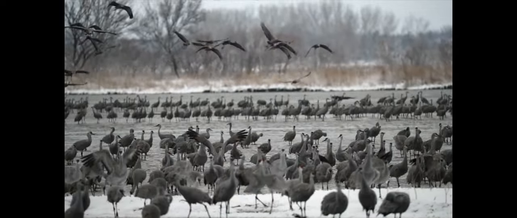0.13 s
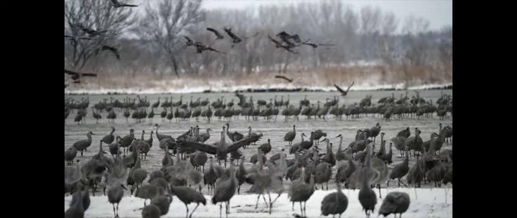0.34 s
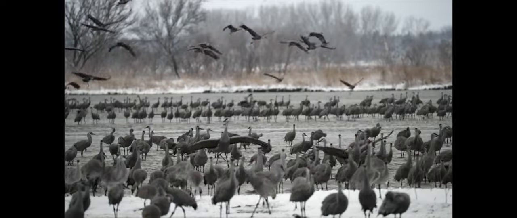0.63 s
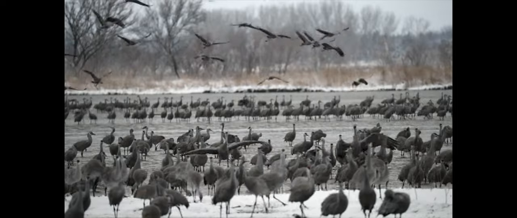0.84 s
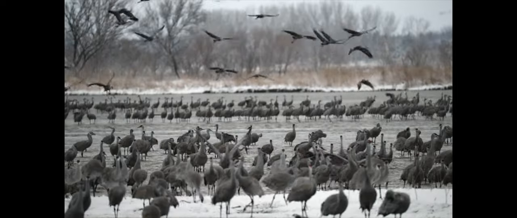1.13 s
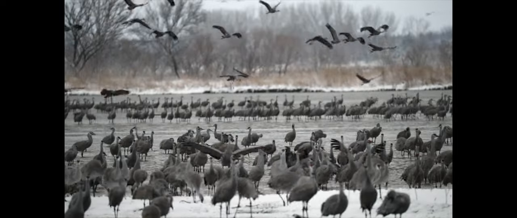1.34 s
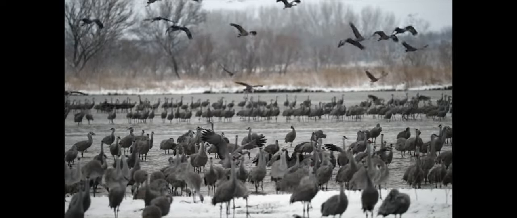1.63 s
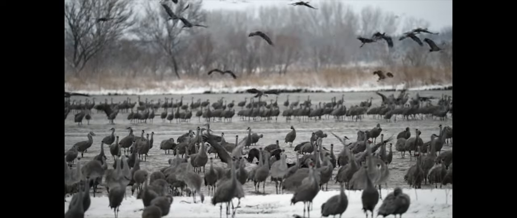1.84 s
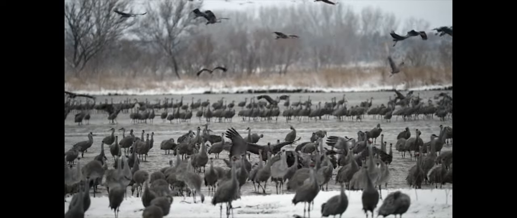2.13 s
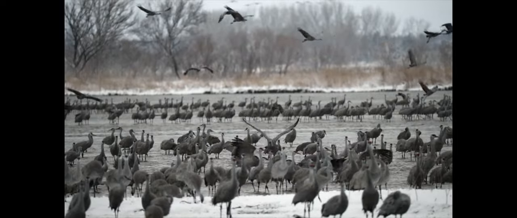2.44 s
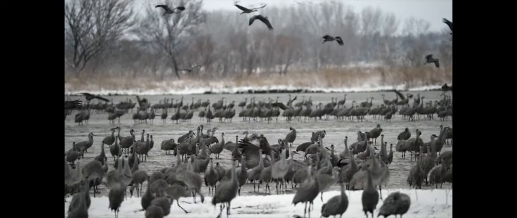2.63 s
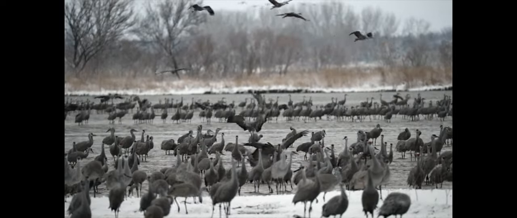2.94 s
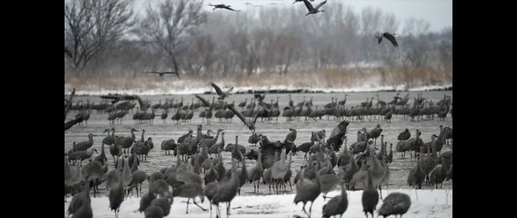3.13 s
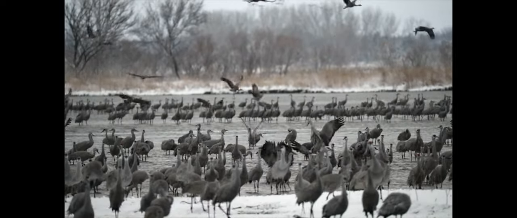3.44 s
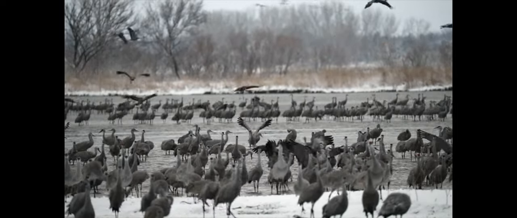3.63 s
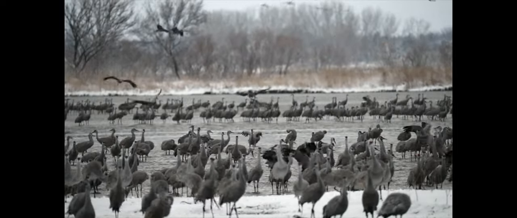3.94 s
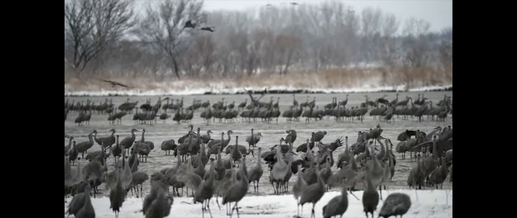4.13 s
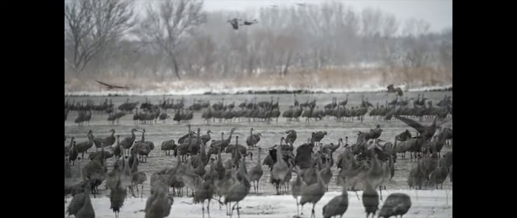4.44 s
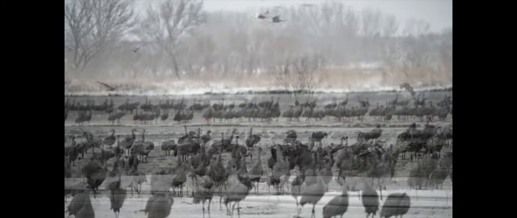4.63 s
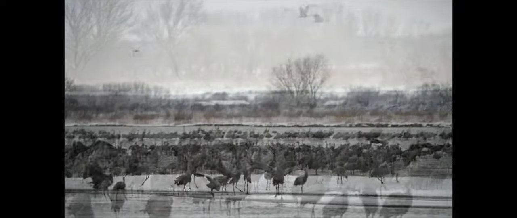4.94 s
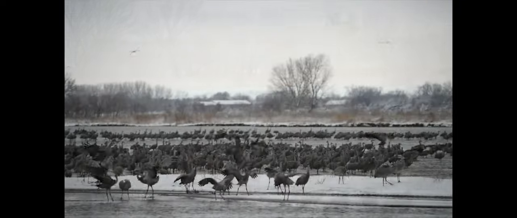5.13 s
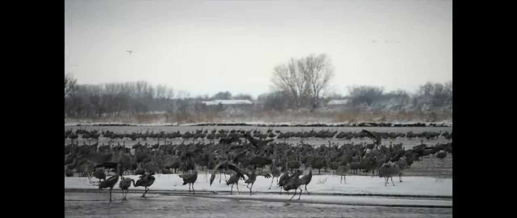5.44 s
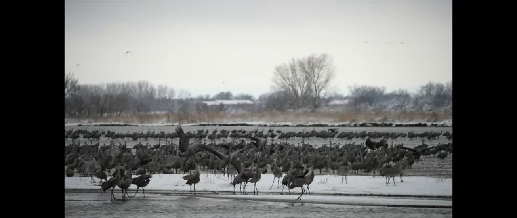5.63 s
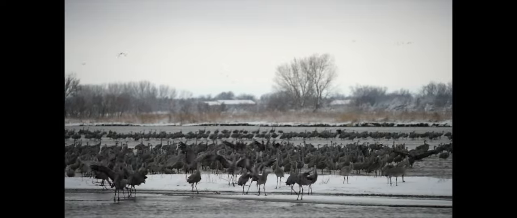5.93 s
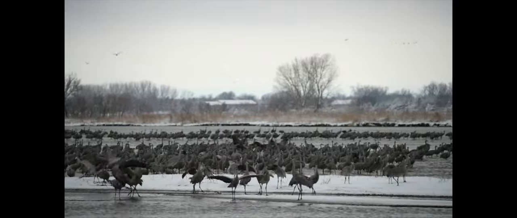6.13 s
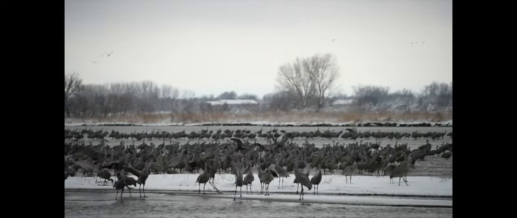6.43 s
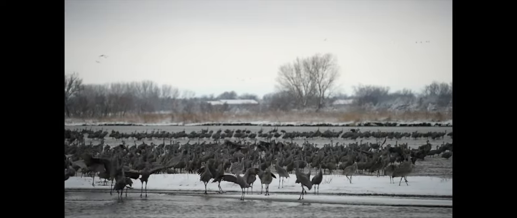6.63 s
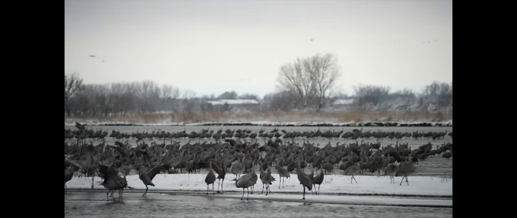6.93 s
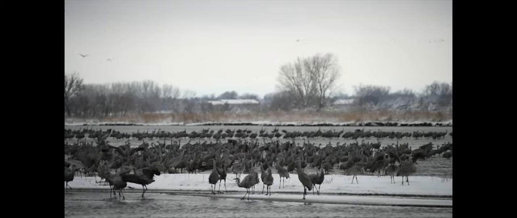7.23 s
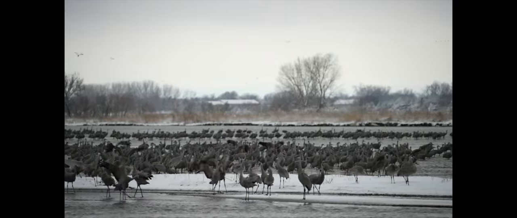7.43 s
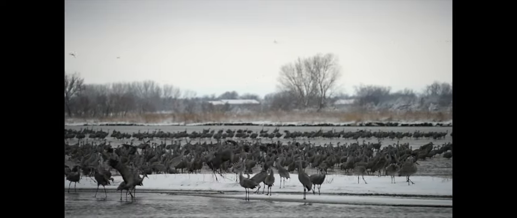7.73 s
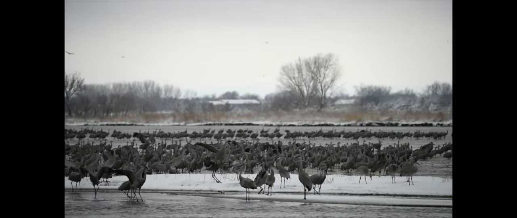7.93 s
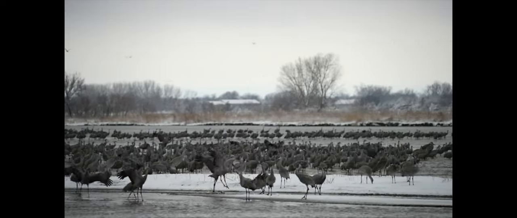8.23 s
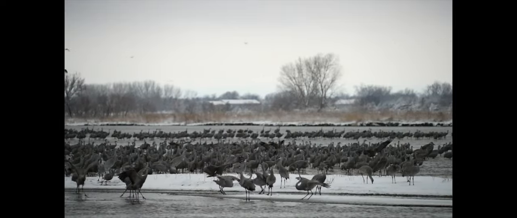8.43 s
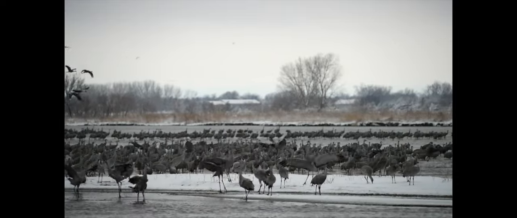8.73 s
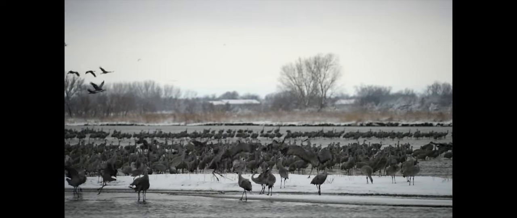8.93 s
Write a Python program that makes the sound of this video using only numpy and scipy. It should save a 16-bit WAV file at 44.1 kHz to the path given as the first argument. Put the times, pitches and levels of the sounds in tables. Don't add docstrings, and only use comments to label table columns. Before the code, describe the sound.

Dense crane chorus heard from near the flock: throaty trills of rapid falling notes, short honking bugles and rounder calls overlap in uneven surges. After about four and a half seconds the microphone seems to move away; the calls soften, gaps open, and single rattles stand out over a faint rolling murmur, soft water, thin high peeps and light hiss. Open air, only slight echo.

```python
import sys
import numpy as np
from scipy import signal
from scipy.fft import rfft, irfft, next_fast_len
from scipy.io import wavfile
from scipy.ndimage import uniform_filter1d, map_coordinates

SR = 44100
rng = np.random.default_rng(int(sys.argv[2]) if len(sys.argv) > 2 else 0)


def to_wav(sig):
    pcm = np.clip(np.atleast_2d(sig), -1, 1) * 32767
    pcm = np.round(pcm).astype(np.int16)
    wavfile.write(sys.argv[1], SR, pcm.T)


def to_linear_factor(level_db):
    exponent = np.asarray(level_db, float) / 20
    return 10 ** exponent


N = 400428

# time in seconds, level in dB.
LISTENING_POINT = [
    (0.0, -72.5),
    (4.55, -73.5),
    (5.0, -84),
    (9.08, -84),
]


def rattles():
    # start in seconds, pitch in Hz, level in dB, octave in dB.
    single_notes = [(.449, 850, -34, -26), (.632, 1222, -49, -5), (.667, 793, -32.5, -31),
                    (.848, 1170, -39.5, -28), (.917, 900, -41, -22), (1.036, 1170, -38.5, -23),
                    (1.244, 839, -34, -31), (1.413, 950, -40, -34), (1.496, 940, -43, -27),
                    (1.972, 1414, -44, -12), (2.135, 947, -39, -24), (2.418, 1040, -41, -21),
                    (2.511, 1196, -42, -32), (2.68, 876, -38, -36), (2.897, 944, -42.5, -20),
                    (2.981, 847, -46, -12), (3.153, 1152, -41, -21), (3.489, 923, -38.5, -23),
                    (3.492, 1178, -44, -14), (3.535, 970, -47, -9), (4.215, 935, -40.5, -32),
                    (4.394, 1220, -45, -27.4), (4.617, 1155, -48, -28), (4.652, 904, -41, -28),
                    (5.816, 1133, -41, -39), (6.76, 960, -51, -18.5), (7.261, 1216, -51, -27),
                    (7.277, 928, -46, -24.4), (8.567, 929, -54.5, -25), (8.784, 1040, -46.5, -34),
                    (2.331, 1357, -52, -4), (2.396, 1280, -53.5, -3), (8.781, 1223, -57, -29)]
    # start in seconds, length in seconds, notes per second,
    # pitch in Hz, level in dB.
    facing = [(.485, 0.11, 27.5, 1450, -49), (.451, 0.16, 27.4, 1285, -51), (.918, 0.093, 28.7, 1190, -46),
              (1.098, .23, 22.4, 1130, -57), (2.516, 0.35, 22, 770, -60), (2.882, .05, 19.5, 1153, -49),
              (3.645, 0.09, 22.3, 1270, -53), (3.791, 0.09, 22.2, 1288, -45), (5.4, 0.067, 27, 878, -63),
              (6.211, .237, 25.3, 1215, -61), (8.575, .12, 29.4, 835, -60), (7.299, 0.17, 32, 1226, -60.5),
              (8.49, 0.21, 25.5, 774, -63)]
    # start in seconds, length in seconds, notes per second,
    # pitch in Hz, level in dB.
    turned = [(.179, .11, 27.3, 1110, -45), (.441, 0.094, 24, 1140, -42.5), (1.532, 0.23, 15, 1140, -47.5),
              (1.909, .133, 28.9, 1200, -44), (2.301, 0.035, 23, 1320, -43), (3.032, .15, 26, 1434, -51.5),
              (3.9, .2, 20.4, 1200, -56), (4.332, .042, 23, 1100, -48.5), (4.722, 0.2, 21, 1350, -54.5),
              (5.175, 0.033, 19, 1033, -53), (5.528, 0.038, 24, 1050, -55), (6.3, .225, 26.5, 1160, -53.5),
              (6.566, 0.085, 27.6, 1050, -55), (6.847, .033, 30.3, 1170, -53),
              (7.1, 0.23, 21.4, 793, -55.5), (7.611, 0.15, 26.7, 1030, -51.5),
              (8.166, 0.24, 30.6, 1110, -57), (8.381, 0.036, 23.1, 1050, -48),
              (8.828, 0.19, 23, 1210, -52.5), (5.227, .16, 22.3, 1380, -59.5), (4.0, .3, 24, 1420, -59),
              (2.04, 0.12, 28, 1400, -57), (5.88, .09, 25, 1350, -56.5), (8.55, .08, 25, 1200, -60),
              (6.94, .09, 23, 1330, -57.5), (3.4, .16, 25, 1350, -56), (5.12, .5, 22, 740, -64.5),
              (2.12, 0.3, 24, 760, -54.5), (1.48, 0.34, 23, 735, -56)]
    rows = [(s - .003, hz, db + 2.5, octave_db + 3.0) for s, hz, db, octave_db in single_notes]
    for birds, octave_db in ((facing, -9), (turned, -22.5)):
        for s, length, rate, hz, db in birds:
            step = np.arange(round(length * rate) + 1) / rate
            swell_db = 4 * np.sin(np.pi * (step + 0.067) / (length + 0.14))
            for delay, rise in zip(step, swell_db):
                rows.append((s - .006 + delay, hz, db + rise + 2.5, octave_db))
    return clicks(*np.transpose(rows), fall=0.15, life=0.0135, click_db=0.0, scatter=0.35)


def clicks(starts, hz, db, octave_db, fall, life, click_db, scatter):
    t = np.arange(int(2.6 * life * SR)) / SR
    chance = scatter * rng.standard_normal((len(starts), 3))
    span = life * np.exp(0.23 * chance[:, :1])
    drop = 1 + fall * (np.exp(-t / (.27 * span)) - .25)
    pitch = hz[:, None] * (1 + .015 * chance[:, 1:2]) * drop
    phase = 2 * np.pi * np.cumsum(pitch, 1) / SR
    octave = to_linear_factor(octave_db)[:, None]
    overtones = np.sin(2 * phase) + 0.17 * np.sin(3 * phase) + 0.046 * np.sin(4 * phase)
    tone = np.sin(phase) + octave * overtones
    shape = (1 - np.exp(-t / 0.0015)) * np.exp(-(t / span) ** 2)
    breath_band = signal.butter(2, [1300, 5200], "band", fs=SR, output="sos")
    breath = signal.sosfilt(breath_band, rng.standard_normal(pitch.shape))
    click = octave * to_linear_factor(click_db - 60 * t / 0.054) * breath
    level = to_linear_factor(db + 1.86 * chance[:, 2])[:, None]
    return mix(starts, level * (tone * shape + click))


def held():
    # start in seconds, length in seconds, pitch in Hz, level in dB.
    level_notes = [(.353, 0.096, 824.6, -45), (1.905, 0.05, 1098, -51), (1.995, 0.039, 1107, -52),
                   (2.036, .04, 1200, -47), (2.411, 0.048, 1100, -44.5), (2.718, 0.067, 852, -49),
                   (3.139, 0.082, 1192, -47.5), (3.5, 0.14, 810, -52.5), (3.534, .1, 927, -43),
                   (3.665, 0.03, 838, -48), (4.727, 0.049, 1208, -56.5), (4.889, 0.065, 761, -57.5),
                   (5.25, 0.098, 893, -62.5), (5.66, 0.088, 1240, -56.5), (7.23, 0.032, 808, -56),
                   (7.655, 0.064, 1148, -61), (7.839, 0.0665, 796, -58), (8.283, 0.068, 1243, -59),
                   (8.529, 0.052, 818, -61.5), (8.926, 0.14, 908, -60.5), (8.52, .1, 1225, -63)]
    # start in seconds, length in seconds,
    # middle pitch in Hz, level in dB.
    sagging = [(.634, 0.055, 1203, -44.5), (0.702, 0.044, 746, -48), (1.312, 0.046, 750, -46.5),
               (1.819, 0.039, 783, -48), (2.086, 0.086, 1148, -46.5), (2.223, 0.052, 930, -47.5),
               (2.571, 0.067, 879.7, -52.5), (3.246, 0.078, 1125, -50), (3.629, 0.06, 1130, -52),
               (4.033, 0.12, 813, -53), (5.935, 0.071, 1148, -43), (6.92, .04, 1118, -61),
               (7.751, 0.07, 937, -49.5), (7.963, 0.055, 1039, -56), (8.615, 0.049, 1104, -53),
               (8.672, 0.089, 817, -60.5), (8.995, 0.074, 1056, -55)]
    # start in seconds, length in seconds,
    # first pitch in Hz, last pitch in Hz, level in dB.
    soft = [(7.55, 0.1426, 740, 685, -62.5), (8.08, 0.075, 1370, 1400, -66), (1.015, 0.11, 1225, 1170, -44),
            (5.45, .06, 1110, 1040, -58), (5.58, 0.092, 1225, 1250, -60), (3.712, .15, 853, 828, -43.5),
            (3.1, 0.0883, 880, 760, -52.5), (6.9, 0.09, 860, 800, -63), (2.41, 0.1, 760, 720, -50.5),
            (6.2, 0.22, 830, 730, -63), (1.9, 0.086, 830, 750, -51.5), (1.14, 0.11, 1300, 1000, -54),
            (8.53, .53, 310, 305, -82), (9.01, .07, 540, 570, -73)]
    # start in seconds, length in seconds,
    # first octave in Hz, last octave in Hz, level in dB.
    octaves = [(0.096, 0.069, 2060, 2030, -57.5), (0.011, 0.028, 1810, 1790, -56),
               (1.824, 0.051, 1812.0, 1600, -62), (1.995, 0.047, 1829.0, 1790, -58),
               (.58, .045, 1870, 1790, -61), (.65, .04, 2390, 2360, -59), (1.045, .075, 2450, 2370, -51),
               (4.754, .042, 2416, 2372, -64), (5.51, .21, 1945, 1920, -71.5), (3.96, .06, 1870, 1760, -62),
               (.113, .045, 1680, 1660, -59), (6.935, .028, 2480, 2440, -70.5),
               (7.035, 0.036, 2420, 2400, -74), (2.338, 0.018, 2510, 2470, -53),
               (3.355, .04, 1820, 1780, -59), (3.527, .03, 2110, 2070, -57), (3.735, .03, 2250, 2150, -59),
               (2.41, .028, 2300, 2190, -58), (3.685, 0.16, 1690, 1690, -62),
               (3.86, 0.065, 1690, 1600, -59), (5.456, 0.043, 2204.0, 2170, -70),
               (8.255, 0.069, 1915, 1860, -66.5)]
    # start in seconds, length in seconds,
    # first pitch in Hz, last pitch in Hz, octave level in dB.
    brassy = [
        (2.923, 0.07, 1104, 1049, -59.5),
        (3.195, 0.096, 1203, 1122, -58),
        (3.886, 0.061, 1108, 1019, -54),
        (4.08, 0.041, 977, 972, -59.5),
        (2.065, .09, 1207, 1143, -57.5),
        (7.425, 0.04, 950, 940, -66.5),
    ]
    # start in seconds, length in seconds,
    # first pitch in Hz, last pitch in Hz, octave level in dB.
    ringing = [
        (7.655, .23, 985, 962, -72.5),
    ]
    ladder = np.arange(9)
    glides = [*soft]
    glides += [(s, length, hz, hz, db) for s, length, hz, db in level_notes]
    for s, length, hz, db in sagging:
        sag = 0.98 * length / 2
        glides.append((s, length, hz * (1 + sag), hz * (1 - sag), db))
    calls = [bugle(*r[:4], r[4] + np.array([-0.5, -30, -32, -41])) for r in glides]
    for s, length, first, last, db in octaves:
        calls.append(bugle(s, length, first / 2, last / 2, [db - 5.5, db, db - 12.5, db - 28]))
    calls += [bugle(*r[:4], np.r_[r[4] + 1.5, r[4] - 6 * ladder], bend=1.76) for r in brassy]
    calls += [bugle(*r[:4], np.r_[r[4], r[4] - 2.1 * ladder]) for r in ringing]
    return sum(calls)


def bugle(s, length, hz_from, hz_to, levels_db, waver=0.003, bend=1):
    t = np.arange(int((length + 0.016) * SR)) / SR
    knots = rng.standard_normal((2, 40))
    pitch_waver, level_waver = [map_coordinates(k, [t * 70]) for k in knots]
    glide = hz_from + (hz_to - hz_from) * (t / length) ** bend
    phase = 2 * np.pi * np.cumsum(glide * (1 + waver * pitch_waver)) / SR
    effort = np.sin(np.pi * t / (t[-1] + 1 / SR)) * to_linear_factor(1.2 * level_waver)
    tone = sum(to_linear_factor(db) * effort ** (0.099 * k) * np.sin((k + 1) * phase) for k, db in enumerate(levels_db))
    shape = np.clip(np.minimum(t, t[-1] - t) / 0.017, 0, 1) * to_linear_factor(1.3 * level_waver)
    return mix([s - .01], np.sqrt(2) * (tone * shape)[None])


def middle():
    # start in seconds, pitch in Hz, level in dB.
    from_near_point = [(0.02, 913, -42), (0.052, 757, -43.5), (0.108, 872, -46), (0.11, 1086, -39.3),
                       (0.136, 1074, -39), (0.17, 894, -39.5), (0.215, 940, -41), (0.243, 1096, -38.5),
                       (0.337, 1085, -37), (0.481, 844, -34), (0.521, 1113, -37), (0.569, 1087, -36),
                       (0.844, 915, -40.5), (0.866, 1052, -40), (0.902, 1210, -39.4), (0.944, 1181, -39),
                       (0.958, 1107, -37.5), (1.016, 854, -36), (1.115, 1144, -40), (1.203, 1087, -39),
                       (1.295, 937, -41.5), (1.323, 904, -40.5), (1.465, 926, -44.0), (1.584, 930, -43.5),
                       (1.616, 1095, -39.5), (1.664, 1060, -39.8), (1.682, 1089, -42), (1.822, 800, -40),
                       (2.009, 1130, -36.5), (2.095, 940, -35.5), (2.147, 1124, -36.4), (2.347, 1039, -44),
                       (2.365, 1303, -41.3), (2.381, 1290, -42.5), (2.45, 775, -39), (2.476, 786, -43.5),
                       (2.504, 754, -43), (2.512, 1094, -39.3), (2.56, 1108, -42), (2.602, 860, -38),
                       (2.636, 880, -39.7), (2.722, 846, -42), (2.768, 840, -39.5), (2.796, 855, -37.5),
                       (2.893, 934, -40.5), (2.913, 908, -39), (2.923, 1188, -40), (2.977, 848, -42),
                       (2.999, 1037, -43), (3.053, 790, -38.1), (3.119, 900, -39.0), (3.181, 1186, -37),
                       (3.215, 1184, -42), (3.306, 758, -40.5), (3.326, 926, -41), (4.019, 1194, -46),
                       (4.049, 1070, -49), (4.063, 1190, -47), (4.083, 983, -46.0), (4.145, 800, -49)]
    # start in seconds, pitch in Hz, level in dB.
    from_far_point = [(4.562, 910, -46.2), (4.574, 1130, -47), (4.608, 902, -41), (4.627, 934, -45.5),
                      (4.669, 890, -42), (4.703, 872, -48), (4.757, 868, -46.5), (4.915, 784, -48.1),
                      (4.935, 800, -46.5), (4.975, 851, -50.5), (5.172, 732, -50), (5.26, 1037, -51.0),
                      (5.302, 1378, -56), (5.406, 1081, -50), (5.446, 1213, -52), (5.519, 1028, -50),
                      (5.575, 991, -50), (5.601, 1098, -49), (5.611, 980, -47.5), (5.631, 1208, -53),
                      (5.751, 1184, -45.3), (5.783, 1095, -45), (6.26, 829, -48), (6.326, 1174, -54),
                      (6.33, 880, -53), (6.338, 952, -53), (6.415, 810, -54), (6.459, 812, -50.5),
                      (6.517, 1080, -53), (6.563, 964, -51), (6.617, 915, -49.0), (6.667, 904, -51.5),
                      (6.701, 935, -51), (6.803, 1126, -56), (6.842, 908, -55), (6.858, 887, -49),
                      (6.893, 1260, -50.5), (6.92, 1141, -50), (6.984, 1190, -50), (7.062, 1077, -53),
                      (7.16, 1100, -51), (7.23, 1045, -50), (7.263, 1154, -46.0), (7.289, 1206, -49.0),
                      (7.395, 1130, -53), (7.407, 884, -49.5), (7.71, 1084, -49), (7.712, 969, -49),
                      (8.157, 1102, -49), (8.189, 1109, -47.5), (8.223, 1072, -47.9), (8.251, 1212, -47),
                      (8.283, 1090, -48), (8.331, 1133, -47.5), (8.367, 1162, -45.4), (8.562, 930, -49),
                      (8.602, 851, -52), (8.73, 815, -51), (8.748, 800, -55), (8.774, 1190, -54)]
    s, hz, db = np.transpose([*from_near_point, *from_far_point])
    return clicks(s, hz, db, 0 * db - 22, fall=0.048, life=.019, click_db=-1.5, scatter=0.31)


def windpipe(calls):
    # frequency in Hz, gain in dB.
    throat = [(600, -1), (2500, 2), (3500, -10), (4100, -4.5), (4850, -1.5), (5800, -7), (7500, -14),
              (11000, -13)]
    return shaped(calls, throat)


def peeps():
    # start in seconds, length in seconds, first pitch in Hz, last pitch in Hz, level in dB.
    piping = [(2.93, .03, 3360, 3200, -60), (2.977, 0.04, 3110, 3080, -61.5),
              (4.845, 0.026, 4350, 4330, -75), (4.906, 0.038, 4050, 4170, -75),
              (4.95, .045, 3860, 3680, -76), (5.097, 0.028, 3270, 3080, -74),
              (5.159, 0.097, 3870, 3740, -80.5), (1.05, .055, 3660, 3560, -67),
              (5.6, 0.17, 4795, 4830, -86), (5.778, 0.043, 4680, 4300, -81), (6.95, .03, 3944, 4055, -80),
              (7.05, 0.013, 3280, 3290, -74), (7.11, .02, 3190, 3320, -74), (7.189, 0.035, 3280, 3300, -78),
              (8.954, .03, 4130, 3820, -76), (7.43, 0.048, 4690, 4410, -78.5),
              (8.829, 0.022, 3800, 4300, -77), (6.389, 0.015, 10300, 10370, -82.5)]
    return sum(bugle(*r[:4], r[4:], waver=0.0077) for r in piping)


def claps():
    # start in seconds, level in dB.
    bill_claps = [
        (5.71, -64),
        (5.975, -66),
        (8.57, -66),
        (8.605, -65),
        (8.645, -69),
    ]
    s, db = np.transpose(bill_claps)
    t = np.arange(SR // 20) / SR
    decay = to_linear_factor(db[:, None] - 60 * t / 0.051)
    ticks = mix(s - .004, decay * rng.standard_normal((len(s), len(t))))
    return shaped(ticks, [(1500, -30), (3600, 9), (6500, -1), (9000, -30)])


def banks(x):
    # frequency in Hz, time to fall 60 dB in seconds.
    echo_times = [(500, 0.53), (1500, 0.37), (5000, 0.084)]
    hz, t, noise = signal.stft(rng.standard_normal(SR // 2), SR, nperseg=256)
    decay = to_linear_factor(-60 * t / along(echo_times, hz)[:, None])
    tail = signal.istft(noise * decay, SR, nperseg=256)[1]
    return signal.fftconvolve(np.pad(x, (300, 0)), tail / np.linalg.norm(tail))[:N]


def flock():
    # peak time in seconds, half width in seconds, peak in dB.
    low_surges = [(0.01, 0.25, -44.5), (.54, 0.14, -43), (1.0, 0.26, -45.5), (1.75, 0.17, -48.5),
                  (2.14, 0.19, -50), (2.55, 0.2, -49), (2.97, 0.13, -45), (3.4, 0.25, -49),
                  (3.85, 0.093, -55), (4.56, 0.29, -55), (5.04, 0.23, -55), (5.92, 0.16, -56.5),
                  (6.3, 0.13, -54.5), (6.68, 0.2, -57.5), (7.05, 0.23, -59), (7.38, 0.14, -53.5),
                  (7.74, 0.14, -54.5), (8.66, 0.18, -56.5), (9.07, 0.073, -59.5)]
    # peak time in seconds, half width in seconds, peak in dB.
    high_surges = [(.1, 0.33, -47), (.48, 0.12, -46.5), (.97, 0.17, -41), (1.62, 0.11, -49),
                   (2.16, 0.23, -45), (2.5, 0.084, -48.5), (3.0, 0.18, -43), (3.4, 0.17, -48),
                   (4.25, 0.19, -50.5), (4.7, 0.24, -53), (5.5, 0.19, -59), (5.85, 0.18, -52),
                   (6.7, 0.18, -58), (7.3, 0.22, -53), (7.75, 0.16, -67), (8.37, 0.19, -54.5),
                   (9.0, .1, -57.5)]
    # frequency in Hz, density in dB per Hz.
    voice_spectrum = [(350, -60.5), (600, -33), (673, -9.5), (793, 1.5), (908, 1), (986, -6), (1070, -6.5),
                      (1220, -10.5), (1340, -26), (1600, -7), (2080, -49), (3520, -120)]
    # frequency in Hz, density in dB per Hz.
    haze_spectrum = [(880, -35.5), (1380, -4.5), (1760, -2), (2440, -5), (3750, -9.5), (6800, -22.5),
                     (8840, -45), (15000, -120)]
    murmur_db, haze_murmur_db = 16.5, 15
    haze_share = to_linear_factor(2 * -11.5)
    base_db = listening_db()

    def over_murmur(power, db):
        return np.sqrt(power + to_linear_factor(2 * (base_db + db)))

    lows, highs = surges(low_surges), surges(high_surges)
    low, high = crowd(715.2, 1000.7, count=110), crowd(955, 1345, count=160)
    haze = low + high + to_linear_factor(-3.5) * rng.standard_normal(N)
    low_voices = over_murmur(lows, murmur_db) * even(coloured(low, voice_spectrum))
    high_voices = over_murmur(highs, murmur_db) * even(coloured(high, voice_spectrum))
    haze_level = over_murmur(haze_share * (lows + highs), haze_murmur_db)
    return low_voices + high_voices + haze_level * even(coloured(haze, haze_spectrum))


def crowd(low_hz, high_hz, count, size=8):
    bird = rng.random((count, 4))
    first = (np.arange(count)[:, None] + bird[:, :1]) / count * (N / SR + .4) - .4
    rate = 19 + 11 * bird[:, 1:2]
    starts = (first + np.arange(size) / rate).ravel()
    hz = np.repeat(low_hz + (high_hz - low_hz) * bird[:, 2], size)
    db = np.repeat(-11 * bird[:, 3], size) - 99 * (starts < 0)
    dry = clicks(np.abs(starts), hz, db, 0 * db - 14.5, fall=.11, life=0.01328, click_db=9.0, scatter=1.06)
    ends = slice(size - 1, None, 2 * size)
    dry += clicks(np.abs(starts[ends]) + .04, hz[ends], db[ends] - .7, 0 * db[ends] - 14,
                  fall=0.051, life=0.065, click_db=-10, scatter=0.787)
    return unit(dry) + to_linear_factor(-7) * unit(banks(dry)) + to_linear_factor(-19.0) * rng.standard_normal(N)


def surges(rows):
    t = np.arange(N) / SR
    blur_db = -2.0
    return sum(to_linear_factor(2 * (db + blur_db)) * np.exp(-((t - s) / width) ** 2) for s, width, db in rows)


def even(x):
    power = np.abs(uniform_filter1d(x ** 2, int(.2 * SR)))
    return x / np.sqrt(power + 1e-9)


def river():
    # frequency in Hz, density in dB per Hz.
    water_spectrum = [(13, -41), (22, -37), (48, -36.5), (59, -30), (171, -11.5), (564, -5), (680, -1.5),
                      (880, -21), (1500, -120)]
    # frequency in Hz, density in dB per Hz.
    hiss_spectrum = [(3820, -9.5), (6500, -10), (8040, -7.5), (13800, -2), (15100, -5), (15900, -6.5)]
    water = to_linear_factor(12.0) * coloured(rng.standard_normal(N), water_spectrum)
    hiss = to_linear_factor(0.84) * coloured(rng.standard_normal(N), hiss_spectrum)
    return to_linear_factor(listening_db()) * (water + hiss)


def listening_db():
    s, db = np.transpose(LISTENING_POINT)
    return np.interp(np.arange(N) / SR, s, db)


def unit(x):
    return x / np.sqrt(np.mean(x ** 2) + 1e-20)


def along(points, hz):
    f, v = np.transpose(points)
    return np.interp(np.log(hz + 1), np.log(f + 1), v)


def shaped(x, spectrum):
    m = next_fast_len(N + 8192)
    gain = to_linear_factor(along(spectrum, np.fft.rfftfreq(m, 1 / SR)))
    return irfft(rfft(x, m) * gain, m)[:N]


def coloured(x, spectrum):
    return unit(shaped(x, spectrum))


def mix(starts, rows):
    at = np.round(np.asarray(starts) * SR).astype(int)[:, None] + np.arange(rows.shape[1])
    return np.bincount(np.clip(at, 0, N).ravel(), rows.ravel(), N + 1)[:N]


def scene():
    far = flock() + river()
    near = windpipe(rattles() + held() + middle()) + peeps() + claps()
    return (near + to_linear_factor(-11.5) * banks(near) + far)[None]


def top_cut(x):
    return signal.sosfilt(signal.butter(12, 15790, fs=SR, output="sos"), x)


def record(dry):
    return top_cut(dry)


dry = scene()
out = record(dry)
to_wav(out)
```